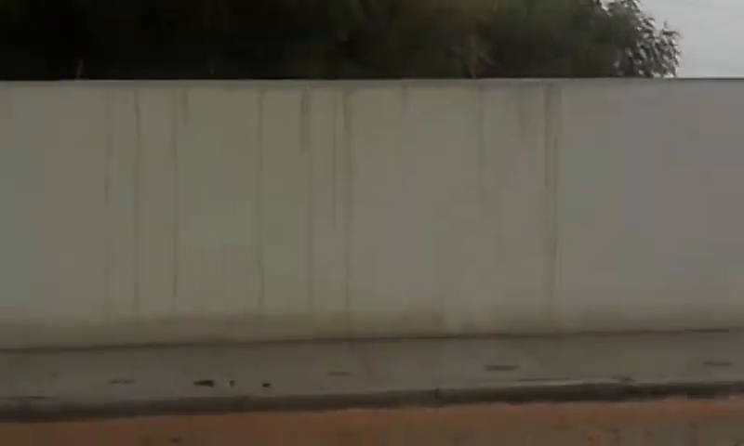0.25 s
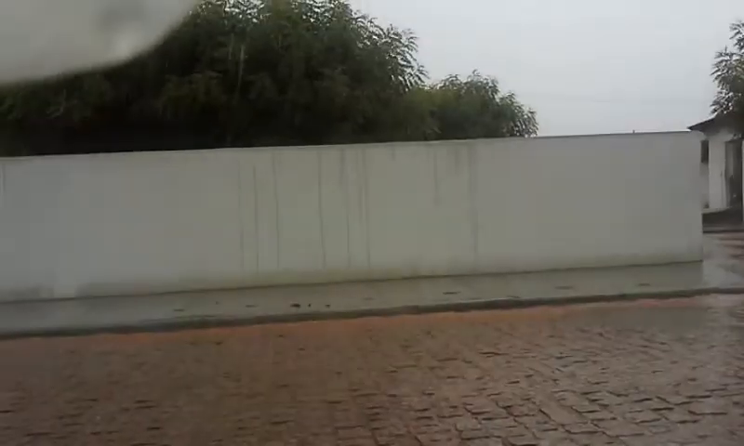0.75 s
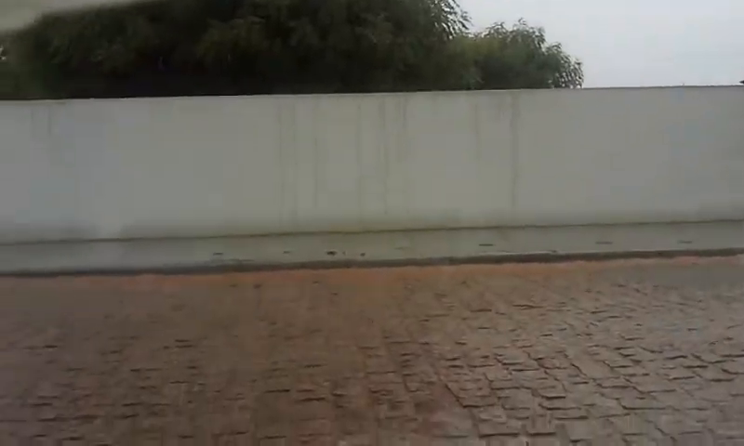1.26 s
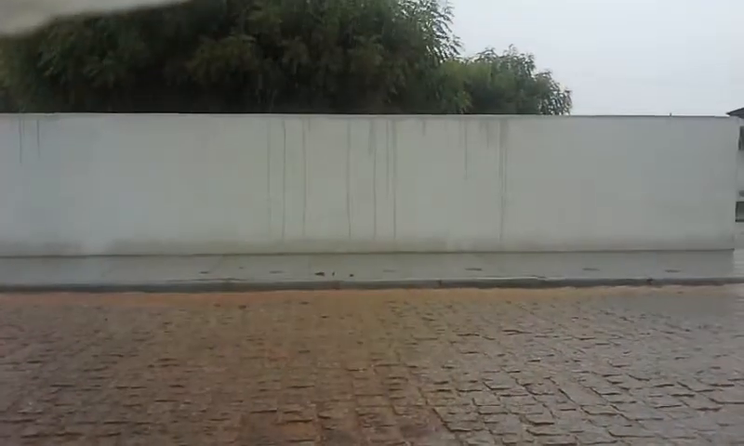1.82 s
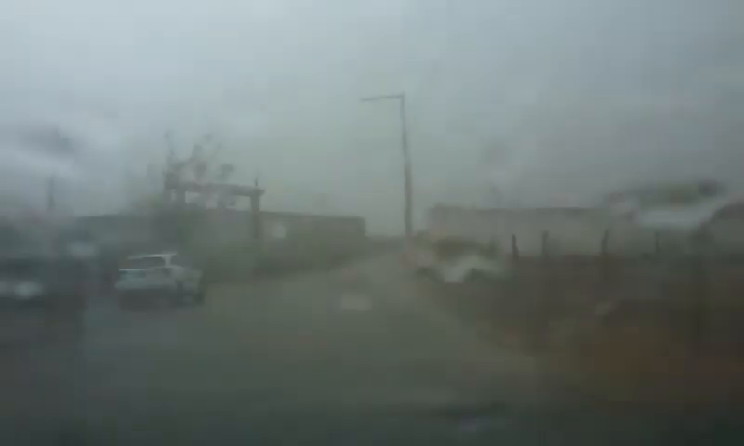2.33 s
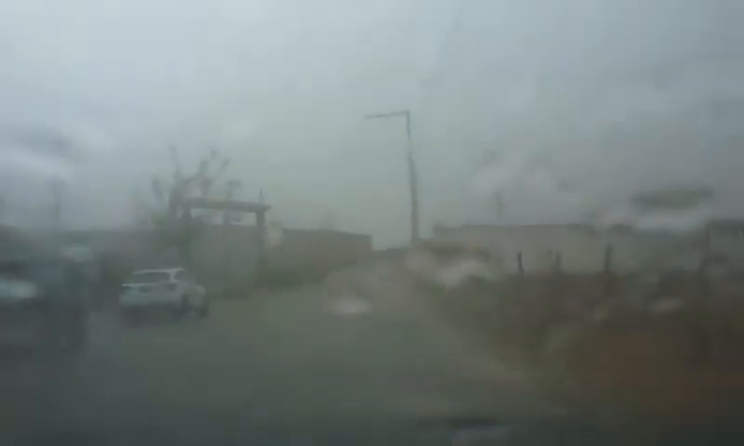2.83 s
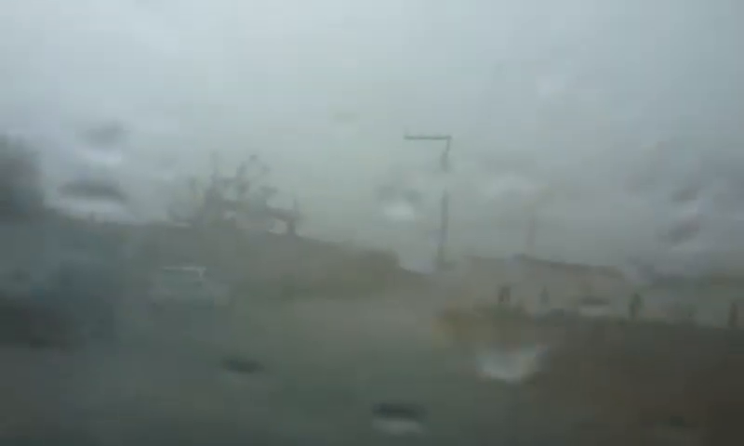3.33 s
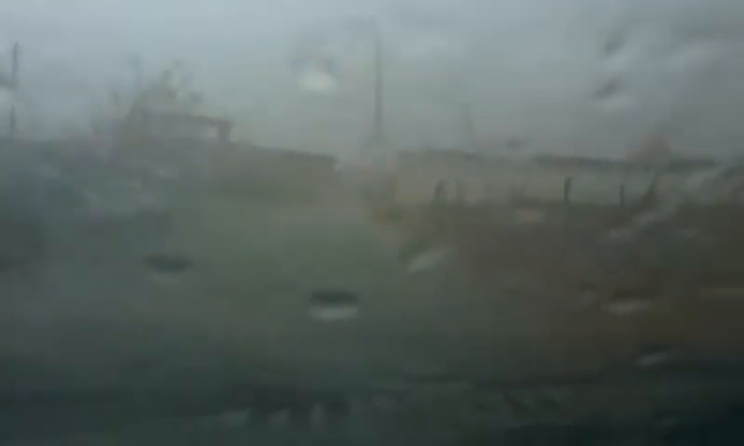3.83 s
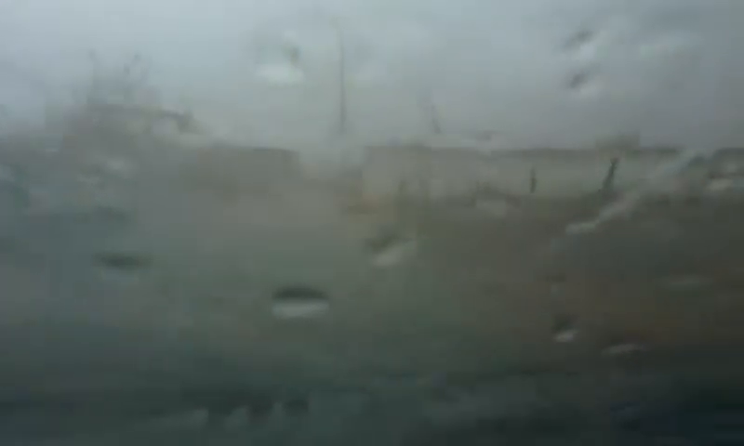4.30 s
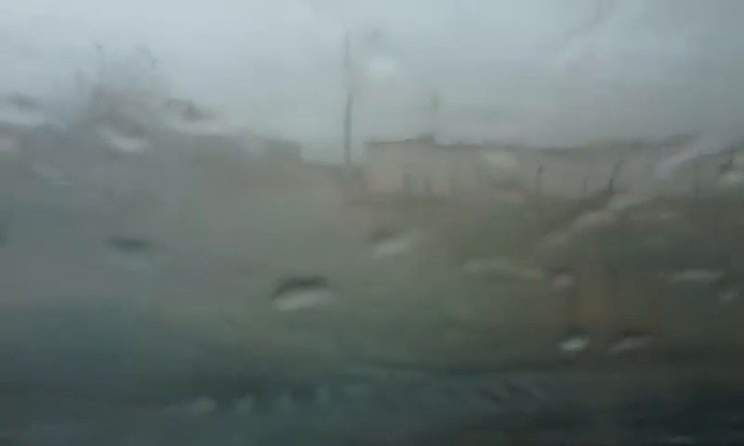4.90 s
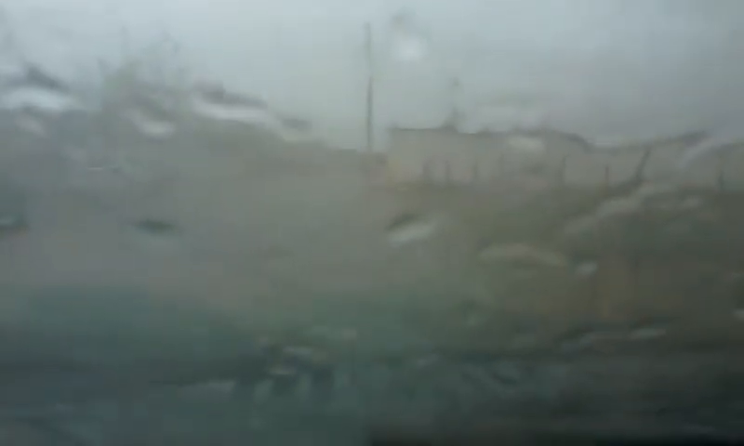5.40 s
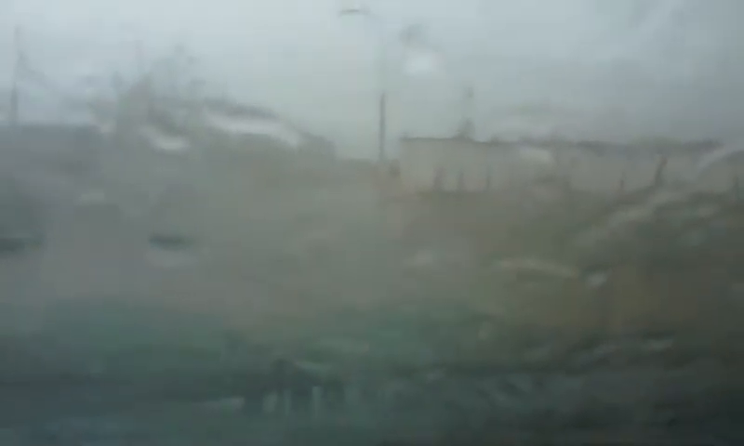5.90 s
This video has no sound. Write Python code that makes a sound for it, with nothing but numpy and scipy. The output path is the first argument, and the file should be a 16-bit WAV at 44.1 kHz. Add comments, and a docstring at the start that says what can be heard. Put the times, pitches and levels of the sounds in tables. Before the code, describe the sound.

Heavy rain on a parked car: big drops smack hard and close for two seconds, then steady hiss with scattered roof taps.

```python
"""Inside a parked car in heavy rain, the microphone close to the bodywork.
Rain runs throughout: random splatter and patchy noise, coloured as drumming panels and hissing glass.
For the first two seconds big drops smack close by, noise bursts shaped by the struck spot, the loudest overloading;
dull thuds from swinging panel modes begin among them, and near 0.6 s four thin ticks ring in the treble.
From 2.5 s single taps on roof and glass stand out from fainter ones and a fine crackle; near 4.1 s one drop pings."""
import sys
import numpy as np
from scipy import signal
from scipy.fft import rfft, irfft, next_fast_len
from scipy.io import wavfile
from scipy.ndimage import uniform_filter1d, map_coordinates

SR = 44100
rng = np.random.default_rng(int(sys.argv[2]) if len(sys.argv) > 2 else 0)


def to_wav(sig):
    """Store sig (one row per channel, or 1-D mono) as 16-bit WAV at the path in sys.argv[1].

    Samples outside -1..1 are clipped; the rate is SR.
    """
    pcm = np.clip(np.atleast_2d(sig), -1, 1) * 32767
    pcm = np.round(pcm).astype(np.int16)
    wavfile.write(sys.argv[1], SR, pcm.T)  # frames by channels


N = 271215

# rainfall over time: start_s [s], drum_db [dB rms], hiss_db [dB rms]
RAIN_LEVELS = [(0.0, -36, -43.5), (0.12, -47, -48), (0.38, -45.5, -49), (0.77, -43.5, -47),
               (0.91, -36.5, -43), (1.11, -46, -45.5), (1.27, -42.5, -51), (1.47, -38.5, -42),
               (1.66, -42, -48.5), (1.95, -43.5, -50), (2.69, -44.5, -47), (3.4, -43.5, -48.5),
               (3.65, -42.5, -42), (3.85, -45.5, -50), (4.35, -41, -42.5), (4.71, -44, -47.5),
               (5.22, -42, -46.5), (6.15, -43, -49)]
# level of the band between drumming and hiss: start_s [s], level_db [dB rms]
MIDDLE_LEVELS = [(0.0, -43), (0.29, -56.5), (1.42, -51), (1.97, -50.5), (4.86, -60), (6.15, -52)]
# relative spectrum of the drumming panels: freq_hz [Hz], density_db [dB per Hz]
DRUM_SPECTRUM = [(15, -51), (25, -26), (43, -22.5), (119, -9), (215, -0.5), (374, -5), (426, -3),
                 (606, -2.5), (1620, -2), (2100, -15.5), (2730, -97), (4620, -120)]
# relative spectrum of the hiss on the glass: freq_hz [Hz], density_db [dB per Hz]
HISS_SPECTRUM = [(1710, -82), (2900, 5), (3530, 10.5), (3830, 8), (4470, 6), (5640, 5.5), (6700, 0.5),
                 (8010, -19.5), (8650, -17), (9350, -25.5), (12000, -27.5), (15600, -75), (22000, -120)]
# relative spectrum between drumming and hiss: freq_hz [Hz], density_db [dB per Hz]
MIDDLE_SPECTRUM = [(1500, -46), (1950, 4.5), (2500, 2.5), (3000, 0.5), (3700, -57)]
# relative spectrum of the far, smooth treble: freq_hz [Hz], density_db [dB per Hz]
AIR_SPECTRUM = [(4410, -37), (7500, -4), (10900, -21), (15200, -17), (16300, -39)]
# big drops close by: start_s [s], level_db [dB rms of the first 4 ms], ring_hz [Hz],
# balance_db [dB, power of low against high]
CLOSE_SMACKS = [(0.0039, -11.5, 970, -4), (0.0149, -13.5, 5800, -2), (0.0317, -22, 5300, -10),
                (0.038, -3.5, 4270, -8.5), (0.0822, -27.5, 3840, -13), (0.1019, -19.5, 3180, -0.5),
                (0.114, -24.5, 2380, 12), (0.1575, -25.5, 2700, 1), (0.1646, -26, 4370, -3),
                (0.1899, -29.5, 5330, -10), (0.2046, -28.5, 4000, -29), (0.2614, -35.5, 1500, -5),
                (0.2976, -27, 4100, -5), (0.3065, -6, 6260, -13.5), (0.318, -18.5, 1030, -4),
                (0.3378, -22.5, 1250, 5), (0.357, -26.5, 1110, 11), (0.4338, -24, 5320, -2.5),
                (0.5384, -13, 1720, 5.5), (0.5527, -24.5, 2600, 3), (0.5596, -22, 4150, -9),
                (0.5744, -22.5, 3870, 0), (0.5983, -23, 1490, 2.5), (0.6141, -27, 3070, -7),
                (0.6525, -31.5, 970, 5), (0.6692, -33, 2660, -8), (0.7025, -23.5, 5600, -32),
                (0.707, -26.5, 1300, 16), (0.7228, -26, 1350, 4), (0.7429, -26.5, 1240, 39),
                (0.7621, -34.5, 1430, 9), (0.7871, -25, 2030, 15), (0.7922, -15, 3770, -3),
                (0.8708, -16, 1700, -2), (0.8918, -14.5, 3100, 3), (0.909, -14.5, 1820, 13),
                (0.9259, -12.5, 4000, -5), (0.9561, -21, 650, 9), (0.9616, -17.5, 1240, -2),
                (0.9796, -25, 4170, 5), (0.9876, -22, 1170, 5), (1.0045, -11.5, 6250, -1.5),
                (1.0179, -13, 4220, -5.5), (1.0275, -15, 4460, -2), (1.036, -18, 5540, -3.5),
                (1.0501, -23.5, 3850, 0), (1.0988, -32.5, 4050, 6), (1.1827, -30, 1950, 5),
                (1.2286, -27, 1730, 5), (1.2495, -30, 1640, 12), (1.2943, -23.5, 5170, -5),
                (1.3017, -12.5, 6540, -7), (1.3287, -13.5, 6400, -2), (1.3388, -15, 5150, -8),
                (1.3618, -3, 4050, -16), (1.3675, -27, 4060, -18), (1.4124, -16, 4040, -0.5),
                (1.4287, -25, 6570, 3), (1.4674, -28, 4060, -17), (1.4845, -17, 3830, -12),
                (1.4911, -17.5, 6140, -10), (1.5049, -10.5, 3350, -8), (1.5421, -19, 3510, -12),
                (1.5583, -25.5, 1870, 24), (1.5781, -19.5, 3570, 1.5), (1.6017, -29.5, 1360, 24),
                (1.6317, -29, 6300, -2), (1.6441, -23, 3900, -4.5), (1.6627, -28.5, 5850, -12),
                (1.78, -28.5, 3750, -9), (1.8221, -26, 3920, -13), (1.8452, -19, 6360, -2),
                (1.8787, -27.5, 1080, 19), (1.899, -30, 1260, -2), (1.9587, -33, 6700, -29),
                (2.016, -31, 5540, -1), (2.1086, -26.5, 3270, -8)]
# base colour of a close drop: freq_hz [Hz], density_db [dB per Hz]
CLOSE_SPECTRUM = [(88, -14), (150, -13), (341, -3), (601, -2.5), (821, -2), (1100, -1), (1980, 2),
                  (2360, 0), (4000, 7), (4760, -0.5), (6390, 4.5), (9630, -23), (16000, -54.5)]
# single drops on roof and glass: start_s [s], level_db [dB rms of the first 4 ms], ring_hz [Hz]
ROOF_TAPS = [(2.559, -31, 3450), (2.5963, -34, 4460), (2.6798, -37, 4500), (2.768, -33.5, 1740),
             (2.7925, -32, 1670), (2.8878, -34.5, 5100), (2.908, -30.5, 4870), (3.0143, -35.5, 1960),
             (3.114, -33, 4300), (3.4305, -35, 4900), (3.456, -31, 4580), (3.5115, -30, 4760),
             (3.535, -33, 5270), (3.5907, -30, 1760), (3.6, -34.5, 5030), (3.673, -31.5, 4340),
             (3.6828, -27.5, 6000), (3.6978, -36.5, 1730), (3.7093, -26.5, 6000), (3.7346, -30, 1770),
             (3.8425, -28, 6040), (4.046, -31.5, 1680), (4.1415, -31, 4850), (4.1812, -32, 1760),
             (4.2248, -32, 5440), (4.3437, -32.5, 5400), (4.382, -29.5, 1020), (4.4636, -33.5, 1320),
             (4.8281, -28, 3850), (4.8637, -31.5, 790), (4.984, -31.5, 5530), (5.0512, -35, 3900),
             (5.1851, -35, 900), (5.474, -31, 1330), (5.6725, -32, 5330), (5.7774, -28.5, 3000),
             (5.8278, -34, 1380), (6.0536, -30, 4630)]
# base colour of a drop heard through the body: freq_hz [Hz], density_db [dB per Hz]
THROUGH_SPECTRUM = [(240, -39), (400, -14), (793, 1.5), (1190, -2.5), (1360, 2), (2510, -6.5), (3820, 1.5),
                    (5670, 5.5), (7700, -15.5), (8650, -17), (9440, -23), (13000, -46)]
# where roof and glass like to ring: ring_hz [Hz]
RING_SPOTS = [860, 1340, 1800, 3230, 3940, 5090, 5660, 6590]
# heavy drips that boom in the bodywork: start_s [s], peak_db [dB], brightness_db [dB per octave],
# damping [1 = free panel]
HEAVY_DRIPS = [(0.035, -15.5, 46, 1.75), (1.362, -9, 6.5, 5.4), (1.371, -29.5, -12, 0.81),
               (2.374, -30, 9, 0.36), (2.792, -35, -3, 1.1), (3.3364, -18, -6.5, 0.77),
               (3.593, -33.5, 8, 0.44), (3.847, -36.5, 1, 0.27), (4.197, -33, 3, 0.36),
               (4.832, -30.5, 7, 0.48), (5.271, -31, 4, 1.9), (5.288, -33, -1, 0.23), (5.681, -32, 8, 0.54),
               (6.08, -32.5, 0, 0.24)]
# low panel modes: mode_hz [Hz, centre], strength_db [dB, relative], t60_s [s, free panel]
PANEL_MODES = [(146, -10, 0.052), (213.4, 2.5, 0.06), (288.7, -2, 0.084), (420.7, -3, 0.083),
               (539.5, -0.5, 0.038)]
# treble modes of a tiny hard contact: mode_hz [Hz, centre], strength_db [dB, relative], t60_s [s]
CONTACT_MODES = [(6200, -4, .003), (10000, 0, .003), (14000, 0, .003)]

# a spot that rings low sounds fuller: usual balance of low against high under and over the split
LOW_SPOT_DB, HIGH_SPOT_DB, SPOT_SPLIT_HZ = 2.5, -6.5, 2500
CLOSE_UNTIL_S = 2.15  # drops land near the microphone up to here
SMACK_RING_DB, SMACK_RISE_S = 15, .0009  # how far a close drop's spot rings out, how softly it starts
# a quick run of thin, bright ticks: start, spacing, peak of the outer and of the inner ones
TICKS_FROM_S, TICK_GAP_S, TICK_OUTER_DB, TICK_INNER_DB = .6138, .00537, -27, -32
PING_S, PING_DB, PING_HZ, PING_T60_S = 4.1405, -24.5, 8610, 0.011  # one short, high ping
TOP_HZ = 16400  # band limit


def amp(db):
    """Decibels to linear amplitude."""
    return 10 ** (np.asarray(db) / 20)


def unit(x):
    """x brought to rms 1."""
    return x / np.sqrt(np.mean(x ** 2) + 1e-20)


def along(points, hz):
    """Reads (Hz, value) points on a log frequency axis."""
    point_hz, value = np.transpose(points)
    return np.interp(np.log(hz + 1), np.log(point_hz + 1), value)


def wobble(rate):
    """A smooth random curve, rate knots a second."""
    knots = rng.standard_normal(int(N * rate / SR) + 4)
    return map_coordinates(knots, [np.arange(N) * rate / SR])


def coloured(x, spectrum):
    """x through a (Hz, dB) spectrum, brought to rms 1."""
    size = next_fast_len(N + 8192)
    gain = amp(along(spectrum, np.fft.rfftfreq(size, 1 / SR)))
    return unit(irfft(rfft(x, size) * gain, size)[:N])


def place(times, sounds):
    """Sums short sounds (rows) into the scene at their times."""
    at = np.round(times * SR).astype(int)[:, None] + np.arange(sounds.shape[1])
    return np.bincount(at.ravel(), sounds.ravel(), N + SR)[:N]


def patter(rate, spread_db, t60, clump_db):
    """Countless small drops: random splatter bursts of widely spread size that come in clumps."""
    sizes_db = spread_db * np.minimum(rng.exponential(1, N), 3) + clump_db * wobble(14)
    hits = (rng.random(N) < rate / SR) * amp(sizes_db)
    fade = amp(-60 * np.arange(SR // 10) / SR / t60)
    return unit(signal.fftconvolve(hits, fade)[:N] * rng.standard_normal(N))


def patchy(depth_db):
    """Noise whose gain wanders in narrow, lingering patches, as one panel resonance after another takes over."""
    cells = signal.stft(rng.standard_normal(N + 512), nperseg=512)[2]
    field = uniform_filter1d(rng.standard_normal(cells.shape), size=3, axis=0)  # over frequency
    field = uniform_filter1d(field, size=14, axis=1)  # over time
    return unit(signal.istft(cells * amp(depth_db * unit(field)), nperseg=512)[1][:N])


def rainfall():
    """Far drops merge into noise, nearer ones stand out; the same drops drum the panels and hiss on the glass."""
    s, drum_db, hiss_db = np.transpose(RAIN_LEVELS)
    t = np.arange(N) / SR
    near = patter(rate=350, spread_db=7.0, t60=0.01, clump_db=3.0)
    drum = coloured(0.51 * near + patchy(depth_db=2.7), DRUM_SPECTRUM)
    hiss = coloured(1.2 * near + patchy(depth_db=3), HISS_SPECTRUM)
    middle = coloured(0.35 * near + patchy(depth_db=4.5), MIDDLE_SPECTRUM)
    air = coloured(rng.standard_normal(N), AIR_SPECTRUM)
    drum_gain = amp(np.interp(t, s, drum_db))
    hiss_gain = amp(np.interp(t, s, hiss_db))
    middle_gain = amp(np.interp(t, *np.transpose(MIDDLE_LEVELS)))
    return drum_gain * drum + hiss_gain * hiss + middle_gain * middle + amp(-74.5) * air


def drops(table, spectrum, t60, rise, ring_db, ring_width, tail_db, tail_t60, ripple_db):
    """Each drop is a burst of splatter with a quieter after-rattle, coloured by the spot it hits."""
    s, level_db, ring_hz, balance_db = np.transpose(table)[:, :, None]
    size, split_hz = 4096, 2500
    half = size // 2
    t, hz = np.arange(half) / SR, np.fft.rfftfreq(size, 1 / SR)
    life = t60 * amp(rng.normal(0, 2.5, s.shape))
    decay = amp(-60 * t / life) + amp(tail_db - 60 * t / tail_t60)
    shape = decay * (1 - np.exp(-t / rise))
    burst = rfft(shape * rng.standard_normal((len(s), len(t))), size)
    # every spot has its own uneven colour and one resonance that stands out
    knots = rng.standard_normal((len(s), 40))
    uneven = map_coordinates(knots, np.broadcast_arrays(np.arange(len(s))[:, None], hz / 600))
    ring = amp(2 * ring_db) / (1 + ((hz - ring_hz) / (ring_width * ring_hz)) ** 2) ** 3
    base = amp(2 * (along(spectrum, hz) + ripple_db * uneven))
    colour_db = 10 * np.log10(base + ring)
    # a shelf sets the power below the split against the power above it
    power = amp(2 * colour_db)
    ratio = power[:, hz < split_hz].sum(axis=1) / power[:, hz > split_hz].sum(axis=1)
    colour_db += (balance_db - 10 * np.log10(ratio[:, None])) / (1 + (hz / split_hz) ** 8)
    # the splatter itself is broadly white: the struck spot alone gives the colour
    colour_db -= 10 * np.log10(uniform_filter1d(np.abs(burst) ** 2, size=70, axis=1))
    # folding the cepstrum makes the colour causal: nothing rings before the impact
    fold = np.r_[1, np.full(half - 1, 2), 1, np.zeros(half - 1)]
    cepstrum = irfft(colour_db * np.log(10) / 20)
    response = np.exp(rfft(cepstrum * fold))
    sound = irfft(burst * response)[:, :half]
    start = np.std(sound[:, :SR // 250], axis=1, keepdims=True)  # first 4 ms
    return place(s[:, 0], amp(level_db) * sound / start)


def balance(ring_hz, scatter_db):
    """Low against high power of a drop, from where its spot rings."""
    usual_db = np.where(ring_hz < SPOT_SPLIT_HZ, LOW_SPOT_DB, HIGH_SPOT_DB)
    return usual_db + scatter_db * rng.standard_normal(len(ring_hz))


def chance_rows(count, until_s, spread_db, above_db):
    """Lesser drops at random moments, each on a random spot, growing with the hiss."""
    s, _, hiss_db = np.transpose(RAIN_LEVELS)
    when, size, spot = rng.random((count, 3)).T
    start_s = when * until_s
    extra_db = above_db - spread_db * np.log(np.maximum(size, .05))
    level_db = np.interp(start_s, s, hiss_db) + extra_db
    ring_hz = np.take(RING_SPOTS, (spot * len(RING_SPOTS)).astype(int))
    return np.transpose([start_s, level_db, ring_hz, balance(ring_hz, scatter_db=3.5)])


def close_drops():
    """The big smacks ring their spots; smaller splashes scattered between them are short, broad ticks."""
    smacks = drops(CLOSE_SMACKS, CLOSE_SPECTRUM, t60=0.0051, rise=SMACK_RISE_S, ring_db=SMACK_RING_DB,
                   ring_width=0.1, tail_db=-25, tail_t60=0.038, ripple_db=3.5)
    small = chance_rows(count=260, until_s=CLOSE_UNTIL_S, spread_db=4, above_db=5.5)
    splashes = drops(small, CLOSE_SPECTRUM, t60=0.004, rise=0.00035, ring_db=12,
                     ring_width=0.11, tail_db=-26.5, tail_t60=0.025, ripple_db=4.5)
    return smacks + splashes


def roof_drops():
    """Single taps heard through roof and glass, among fainter ones and a fine crackle."""
    taps = np.column_stack([ROOF_TAPS, balance(np.transpose(ROOF_TAPS)[2], scatter_db=1)])
    faint = chance_rows(count=70, until_s=N / SR, spread_db=0.5, above_db=7.5)
    through = drops(np.vstack([taps, faint]), THROUGH_SPECTRUM, t60=0.0079, rise=0.00048, ring_db=14.5,
                    ring_width=0.051, tail_db=-14, tail_t60=0.14, ripple_db=6.0)
    fine = chance_rows(count=800, until_s=N / SR, spread_db=1.5, above_db=-1.0)
    crackle = drops(fine, THROUGH_SPECTRUM, t60=0.0057, rise=0.0011, ring_db=7.5,
                    ring_width=0.14, tail_db=-49, tail_t60=0.014, ripple_db=5.5)
    return through + crackle


def ringing(s, peak_db, tilt_db, damping, modes, rise, detune):
    """Blows swing a set of decaying modes, at new strengths and, if detuned, slightly new pitch each time."""
    t = np.arange(SR // 5) / SR
    ring = 0
    for hz, db, t60 in modes:
        strength_db = db + tilt_db * np.log2(hz / 250) + rng.normal(0, 0.63, s.shape)
        envelope = amp(strength_db - 60 * t * damping / t60)
        pitch_hz = hz * (1 + rng.normal(0, detune, s.shape))
        ring = ring + envelope * np.sin(2 * np.pi * pitch_hz * t)
    ring *= (1 - np.exp(-t / rise)) ** 2
    return place(s[:, 0], amp(peak_db) * ring / np.abs(ring).max(axis=1, keepdims=True))


def thuds():
    """Soft, heavy drips swing the panels' low modes."""
    return ringing(*np.transpose(HEAVY_DRIPS)[:, :, None], PANEL_MODES, rise=0.0017, detune=0.055)


def ticks():
    """Four tiny hard contacts ring only in the treble."""
    s = TICKS_FROM_S + TICK_GAP_S * np.arange(4)[:, None]
    peak_db = np.array([[TICK_OUTER_DB], [TICK_INNER_DB], [TICK_INNER_DB], [TICK_OUTER_DB]])
    return ringing(s, peak_db, 0, 1, CONTACT_MODES, rise=.00015, detune=.01)


def ping():
    """A single drop rings something small and hard."""
    return ringing(np.array([[PING_S]]), PING_DB, 0, 1, [(PING_HZ, 0, PING_T60_S)], rise=0.0012, detune=0)


def scene():
    """All the rain around the microphone, as one channel."""
    return (rainfall() + close_drops() + roof_drops() + thuds() + ticks() + ping())[None]


def record(dry):
    """The loudest smacks hit the converter's ceiling; deep bass is cut, nothing is kept above the band limit."""
    clipped = dry / (1 + np.abs(dry) ** 12) ** (1 / 12)
    size = next_fast_len(N + 8192)
    hz = np.fft.rfftfreq(size, 1 / SR)
    edge = np.clip((TOP_HZ - hz) / 400, 0, 1)  # slopes to nothing over 400 Hz
    low_cut = 1j * hz / (40 + 1j * hz)  # first order, 40 Hz
    filtered = irfft(rfft(clipped, size) * edge * low_cut, size)[:, :N]
    return np.clip(filtered, -1, 1)


dry = scene()
out = record(dry)
to_wav(out)
```